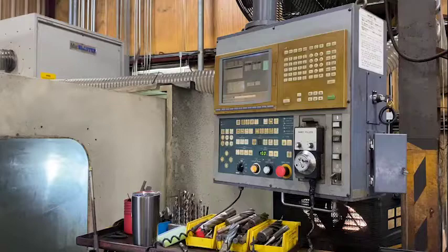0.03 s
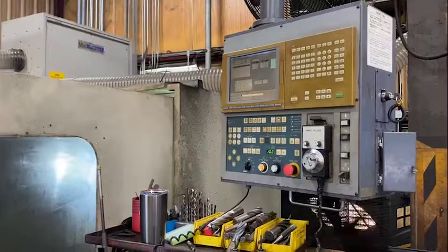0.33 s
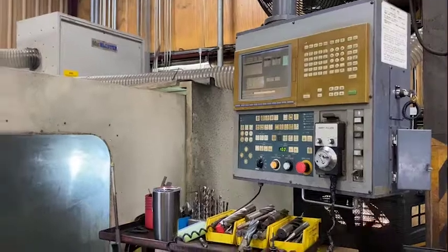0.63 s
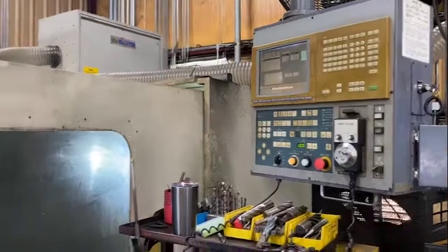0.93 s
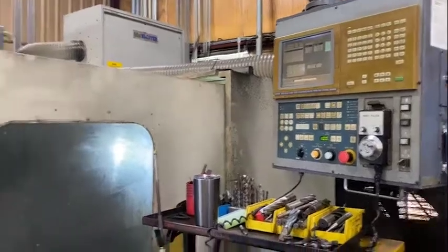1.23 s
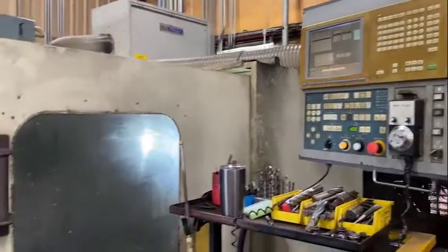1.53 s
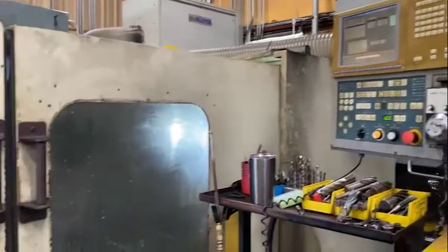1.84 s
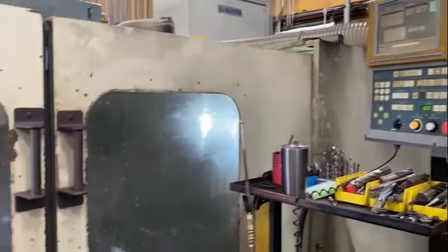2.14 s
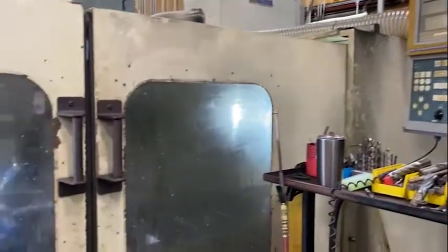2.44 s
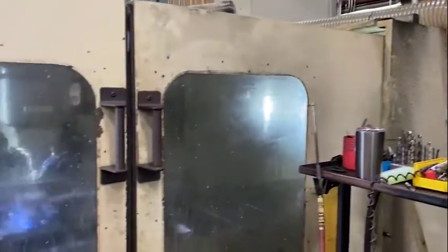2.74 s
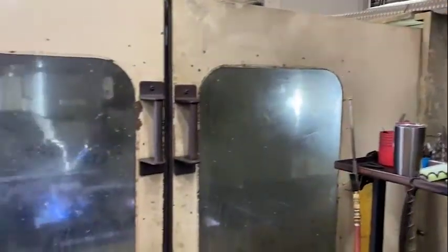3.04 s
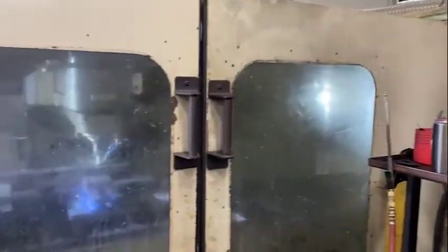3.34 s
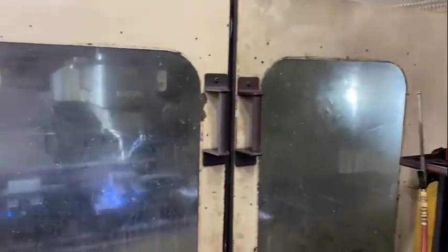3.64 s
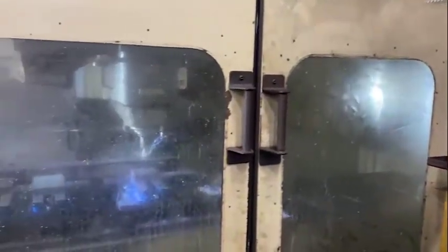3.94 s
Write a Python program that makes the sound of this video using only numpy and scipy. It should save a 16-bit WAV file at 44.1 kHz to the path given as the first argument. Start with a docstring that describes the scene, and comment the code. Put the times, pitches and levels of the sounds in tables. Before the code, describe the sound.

In a workshop, a running machine tool gives a steady droning hum, heard from a slowly passing microphone. High whines waver and rubbing metal swishes in an even rhythm; a short groan slides down, and later a spray hisses once.

```python
"""The spindle of a machining centre sings a harmonic series behind closed doors in a workshop.
Under it, motors hum and the enclosure rumbles through the resonances of its sheet-metal guards.
The drives whine and whistle, a turning part rubs metal modes into a steady rhythm of swishes, a groan
slides down, and once a spray hisses against the guard. A phone carried slowly past hears the tones
swell and fade as they interfere with their reflections."""
import sys
import numpy as np
from scipy import signal
from scipy.fft import rfft, irfft
from scipy.io import wavfile

SR = 44100
rng = np.random.default_rng(int(sys.argv[2]) if len(sys.argv) > 2 else 0)


def transcribe(signal):
    """Save signal, clipped to [-1, 1], as a 16-bit WAV file at the path in sys.argv[1]."""
    frames = np.atleast_2d(signal).T
    limited = np.clip(frames, -1, 1)
    pcm = np.round(limited * 32767).astype(np.int16)
    wavfile.write(sys.argv[1], SR, pcm)


N = 176400

# likeness of the sound field at the two microphones (frequency [Hz], correlation [-1 to 1])
CORRELATION = [(30, 1), (120, 0.93), (280, 0.84), (500, 0.49), (800, 0.43), (1500, -.1), (2200, 0.28),
               (3500, 0.4), (4500, 0.73), (5600, 0.09), (7000, 0.76), (9000, 1), (13000, 0.7), (16000, .7)]


def undb(db):
    """Amplitude ratio of a level in decibels."""
    return 10 ** (np.asarray(db) / 20)


def times():
    """Time of every sample [s]."""
    return np.arange(N) / SR


def bins():
    """Frequency of every spectral bin [Hz]."""
    return np.arange(N // 2 + 1) * SR / N


def curve(rows):
    """Linear interpolation in time through (time [s], value) rows."""
    return np.interp(times(), *np.array(rows).T)


def along(rows, hz):
    """Linear interpolation in log frequency through (frequency [Hz], value) rows."""
    frequencies, values = np.array(rows).T
    return np.interp(np.log(hz + 1e-3), np.log(frequencies), values)


def bell(offset, width):
    """Gaussian pulse of unit height whose standard deviation is the width."""
    return np.exp(-.5 * (offset / width) ** 2)


def flicker(rate_hz):
    """Low-pass Gaussian noise of unit variance."""
    motion = irfft(rfft(rng.standard_normal(N)) * np.exp(-(bins() / rate_hz) ** 2), N)
    return motion / motion.std()


def drift(rate_hz, points=200):
    """Slow low-pass noise of zero mean and about unit variance, interpolated from a coarse grid."""
    hz = bins()[:points // 2 + 1]
    lowpass = np.exp(-(hz / rate_hz) ** 2) * (hz > 0)
    motion = irfft(rfft(rng.standard_normal(points)) * lowpass, points)
    return np.interp(np.linspace(0, points - 1, N), np.arange(points), motion / motion.std())


def phase_per_hz(wander, rate_hz=4):
    """Phase is the integral of frequency, which here wanders by a small fraction."""
    return 2 * np.pi * np.cumsum(1 + wander * drift(rate_hz)) / SR


def walk_gain(levels_db, passing_s=(0.44, 1.94, 3.03)):
    """Level depends on position: the phone passes the control panel, a place between, then the doors."""
    return undb(curve(list(zip(passing_s, levels_db))))


def room_noise(gain):
    """Partial coherence: independent mid and side noises set how alike the two channels are."""
    alike = np.clip(along(CORRELATION, bins()), -.995, .995)
    spectra = rfft(rng.standard_normal((2, N))) * gain
    mid, side = spectra * np.sqrt(np.array([1 + alike, 1 - alike]) * SR / 4)
    return irfft(np.array([mid + side, mid - side]), N)


def room_tone(phase, hz, scatter, rate_hz):
    """Interference: reflections add a random phasor to a tone, changing as the microphones move."""
    alike = np.clip(along(CORRELATION, hz), -.99, .99)
    mid = 1 + scatter * (drift(rate_hz) + 1j * drift(rate_hz)) / np.sqrt(2)
    side = 1j + scatter * (drift(rate_hz) + 1j * drift(rate_hz)) / np.sqrt(2)
    phasors = np.sqrt(1 + alike) * mid + np.sqrt(1 - alike) * side * np.array([[1], [-1]])
    return (phasors * np.exp(1j * phase)).real / np.sqrt(1 + scatter ** 2)


def panel_response(ripple_db=2.2, spacing_hz=9):
    """Closely spaced resonances of the sheet-metal guards ripple the spectrum, less so in the bass."""
    hz = np.arange(0, SR / 2, spacing_hz)
    ripple = np.interp(bins(), hz, rng.standard_normal(len(hz)))
    gain = undb(ripple_db * ripple * np.minimum(bins() / 300, 1))
    return gain / np.sqrt(np.mean(gain ** 2))


def enclosure_wash(octaves=9, lowest_hz=50, treble_hz=9400):
    """Broadband noise filtered by panel resonances; its octaves swell together and flicker singly."""
    # enclosure rumble, fans and coolant (frequency [Hz], spectral density [dB per Hz])
    density = [(20, -82), (35, -56), (52, -50.5), (78, -49.5), (98, -52), (130, -51.5), (180, -56),
               (255, -53.5), (305, -60.5), (450, -60.5), (700, -64.5), (1000, -64.5), (1650, -65.5),
               (2200, -69.5), (3000, -75), (3700, -77.5), (4500, -76.5), (5500, -81.5), (7000, -83),
               (10000, -84), (12000, -86), (16000, -87.5)]
    # overall rise and fall along the walk (time [s], level [dB])
    nearness = [(.1, -1), (.8, 0.5), (2, 0), (3, -0.6), (4, 0.1)]
    # further rise and fall of the treble (time [s], level [dB])
    treble_level = [(.1, 2.5), (.7, 0), (1.4, -2), (2.3, 0.5), (3, 0.5), (3.6, -4), (4, -0.5)]
    spectrum = rfft(room_noise(undb(along(density, bins())) * panel_response()))
    octave = np.clip(np.log2((bins() + 1) / lowest_hz), 0, octaves - 1)
    wash = 0
    for k in range(octaves):
        band = irfft(spectrum * np.maximum(0, 1 - abs(octave - k)), N)
        treble_share = min(1, (lowest_hz * 2 ** k / treble_hz) ** 2)
        wash += band * undb(0.96 * flicker(rate_hz=20) + treble_share * curve(treble_level))
    return wash * undb(curve(nearness) + 0.45 * drift(rate_hz=3.5))


def motor_hum():
    """Periodic vibration: pumps, fans and transformers each radiate at their own frequency."""
    # hum lines (frequency [Hz], level at each of the three places on the walk [dB])
    lines = [(35, -45, -44, -42.5), (72.35, -41, -43, -40.5), (84.24, -38.5, -35, -36.5),
             (109.8, -48, -38.5, -38.5), (119.2, -46, -54, -42.5), (238.6, -45.5, -38.5, -39),
             (266.1, -43.5, -57, -42), (338, -48, -42, -57), (354.3, -35.5, -38, -33),
             (375, -43, -60, -48.5), (439.4, -55, -51, -52), (480, -50, -48, -53), (535.5, -49, -41, -44.5),
             (586, -53, -48, -58), (802.5, -54, -49, -42.5), (908, -57, -48, -54), (1493, -57, -58, -51),
             (1701, -60, -56, -42)]
    hum = 0
    for hz, *levels_db in lines:
        phase = hz * phase_per_hz(wander=.004) + rng.uniform(0, 2 * np.pi)
        hum += walk_gain(levels_db) * room_tone(phase, hz, scatter=.7, rate_hz=10)
    return hum


def whine(hz=1706):
    """Slight random frequency modulation makes a midrange whine waver."""
    # strength of the whine (time [s], level [dB])
    level = [(.1, -53), (.4, -56), (.7, -49), (1.2, -49), (1.55, -50), (1.9, -47), (2.35, -38.5),
             (2.6, -58), (4, -58)]
    phase = hz * phase_per_hz(wander=.0012, rate_hz=9.1)
    return room_tone(phase, hz, scatter=.4, rate_hz=5) * undb(curve(level))


def groan(band_hz=61):
    """Narrowband noise about a falling centre frequency: a rough resonance slides down and dies."""
    # path of the resonance (time [s], frequency [Hz], level [dB])
    glide = [(1.3, 1663, -59), (1.46, 1574, -39.5), (1.58, 1466, -42), (1.7, 1464, -37), (1.9, 1440, -62)]
    at_s, hz, db = np.array(glide).T
    phase = 2 * np.pi * np.cumsum(curve(np.c_[at_s, hz])) / SR
    channels = [flicker(band_hz) * np.cos(phase) + flicker(band_hz) * np.sin(phase) for _ in range(2)]
    return np.array(channels) * undb(curve(np.c_[at_s, db]))


def drive_sidebands(carrier_hz=4007.5, spacing_hz=60, outer_db=-22):
    """Beating: sidebands one and three spacings either side of the drive's switching tone interfere."""
    # strength of the lower sidebands (time [s], level [dB])
    lower_level = [(.1, -58), (.5, -59), (1.1, -55), (1.8, -53), (2.35, -75), (2.65, -51), (3, -41.5),
                   (3.25, -46), (3.42, -54.5), (3.6, -45), (4, -47)]
    # strength of the upper sidebands (time [s], level [dB])
    upper_level = [(.1, -45.5), (.85, -48.5), (1.2, -59), (1.6, -62), (2.35, -55), (2.6, -46), (2.95, -43),
                   (3.2, -54), (3.7, -59), (4, -62)]
    sidebands = 0
    for offset_hz, level in ((-spacing_hz, lower_level), (spacing_hz, upper_level)):
        for k, db in ((1, 0), (3, outer_db)):
            phase = 2 * np.pi * (carrier_hz + k * offset_hz) * times()
            line = room_tone(phase, carrier_hz, scatter=0.37, rate_hz=0.97)
            sidebands += line * undb(curve(level) + db)
    return sidebands


def servo_whistles(fade_db=5):
    """Standing waves: high tones fade in and out as the phone crosses nodes and antinodes."""
    # whistles of the servo drives (frequency [Hz], RMS level [dB])
    lines = [(6599, -61), (7073, -61), (7601, -67), (7848, -68), (8134, -62), (8381, -59), (8683, -62),
             (8973, -56), (9571, -68), (9829, -60), (10174, -60.5), (11051, -67.5), (11423, -61.5),
             (11666, -58), (12100, -71), (12360, -56), (12774, -68), (13022, -57), (13495, -60),
             (13705, -68), (14220, -65), (14430, -65), (14922, -67), (15160, -65), (15643, -61)]
    whistles = 0
    for hz, db in lines:
        fade = undb(fade_db * drift(rate_hz=7))
        fade /= np.sqrt(np.mean(fade ** 2) / 2)
        whistles += undb(db) * fade * np.sin(hz * phase_per_hz(wander=.0007, rate_hz=17.7))
    return whistles


def whistle_flares():
    """Amplitude modulation by Gaussian pulses: single whistles swell for a moment."""
    # brief swells (time [s], frequency [Hz], highest RMS level [dB], Gaussian width [s])
    swells = [(.14, 11666, -53, 0.046), (.21, 9829, -51, 0.051), (.28, 12360, -54, 0.088),
              (.3, 11600, -53, 0.099), (.362, 8660, -43, 0.065), (.5, 8683, -48, .025),
              (.51, 13022, -43, .04), (0.566, 7601, -50, .05), (.6, 9400, -53, .035), (.6, 12360, -56, .05),
              (0.994, 8080, -43, 0.03), (1.16, 14922, -47, .05), (1.544, 11423, -48, 0.065),
              (1.69, 12700, -51, .04), (1.82, 15643, -57, .05), (1.85, 14922, -53, .12),
              (2.103, 11423, -49, 0.031), (2.26, 12260, -45.5, .06), (2.274, 8134, -45, 0.037),
              (2.38, 11051, -52, 0.067), (2.57, 8381, -48, 0.065), (2.76, 14922, -48, .045),
              (2.922, 10174, -55, .07), (2.965, 14922, -45, .018), (3.144, 10174, -45, .032),
              (3.68, 14800, -53, 0.036), (3.68, 15643, -53, .1)]
    flares = 0
    for at_s, hz, db, width_s in swells:
        whistle = np.sqrt(2) * np.sin(hz * phase_per_hz(wander=.0007, rate_hz=19))
        flares += undb(db) * bell(times() - at_s, width_s) * whistle
    return flares


def metal_rasp(centre_hz=5992, flutter_hz=97):
    """Roughness from fast beats: a thin metallic ring flutters against its sidebands."""
    # the ring and its sidebands (offset from the centre [flutter steps], relative level [dB])
    lines = [(-1.1, -0.5), (0, 2.5), (0.92, 2)]
    # coming and going of the ring (time [s], level [dB])
    level = [(1, -70), (1.3, -58), (1.55, -55), (1.9, -64), (2.25, -57.5), (2.9, -58.5), (3.3, -73)]
    turn = phase_per_hz(wander=.0018, rate_hz=19.6)
    ring = 0
    for steps, db in lines:
        phase = (centre_hz + steps * flutter_hz) * turn
        ring += undb(db) * room_tone(phase, centre_hz, scatter=.9, rate_hz=8.6)
    return ring * undb(curve(level))


def rubbing_swishes(first_s=.41, period_s=.416, rise_s=.055, fall_s=.07, band_hz=28):
    """Friction excites metal modes in a shifting balance; each turn brings a strong rub and a weak one."""
    # modes of the scraped metal (frequency [Hz], relative level [dB])
    modes = [(4215, -7), (4300, -2), (4385, -0.5), (4450, -3), (4520, 0), (4590, -3), (4650, -0.5),
             (4720, 2), (4790, -6), (4880, -13)]
    # strength of the swishes (time [s], level [dB])
    level = [(.42, -42.5), (.83, -42.5), (1.25, -42), (1.67, -41), (2.08, -40), (2.5, -42), (2.9, -41.5),
             (3.3, -41.5), (3.75, -43)]

    def from_nearest(rub_s):
        return (times() - rub_s + period_s / 2) % period_s - period_s / 2

    offset_s = from_nearest(first_s)
    strong_rub = bell(offset_s, np.where(offset_s < 0, rise_s, fall_s))
    weak_rub = 0.4 * bell(from_nearest(first_s + 0.16), width=0.031)
    scrape = 0
    for hz, db in modes:
        resonance = 1 / (1 + ((bins() - hz) / band_hz) ** 2)
        scrape += room_noise(resonance) * undb(db + 2.2 * drift(rate_hz=8.8))
    ragged_gain = undb(curve(level) + drift(rate_hz=20))
    return scrape / scrape.std() * (strong_rub + weak_rub) * ragged_gain


def spray(start_s=3.213, attack_s=.03, hold_s=.035, body_decay_s=0.25, treble_decay_s=0.13):
    """A spray on the guard gives sputtering noise that decays exponentially, the treble first."""
    # hiss of the spray (frequency [Hz], spectral density [dB per Hz])
    density = [(300, -85), (900, -73), (1700, -65.5), (3000, -71), (4500, -72.5), (7000, -76),
               (11500, -77.5), (13500, -88), (16000, -91)]
    since_s = times() - start_s
    attack = np.clip(since_s / attack_s, 0, 1)
    dying_s = np.maximum(since_s - attack_s - hold_s, 0)
    hiss = room_noise(undb(along(density, bins())))
    body = irfft(rfft(hiss) / (1 + (bins() / 5500) ** 4), N)
    treble = hiss - body
    decaying = body * np.exp(-dying_s / body_decay_s) + treble * np.exp(-dying_s / treble_decay_s)
    sputter = undb(2 * flicker(rate_hz=150))
    return attack * decaying * sputter


def spindle(fundamental_hz=262.4):
    """Periodic motion of spindle and cutter gives a harmonic series; reflections shift each phase."""
    # spindle tone (harmonic number, level at each of the three places on the walk [dB])
    harmonics = [(1, -41, -40, -43), (2, -40, -40.5, -42.5), (3, -50, -48, -44.5), (4, -41.5, -41, -47),
                 (5, -54, -49, -43.5), (6, -47, -55, -50), (7, -69, -45.5, -47.5), (8, -61, -70, -48),
                 (9, -54, -54, -48), (10, -61, -61, -78), (11, -55, -57.5, -56)]
    fundamental_phase = fundamental_hz * phase_per_hz(wander=0.0012)
    song = 0
    for k, *levels_db in harmonics:
        phase = k * fundamental_phase + rng.uniform(0, 2 * np.pi)
        song += walk_gain(levels_db) * room_tone(phase, k * fundamental_hz, scatter=0.6, rate_hz=5)
    return song


def scene():
    """Superposition: the sound pressures of all parts of the machine add."""
    machine = enclosure_wash() + spindle() + motor_hum() + whine() + groan()
    drives = drive_sidebands() + servo_whistles() + whistle_flares()
    return machine + drives + metal_rasp() + rubbing_swishes() + spray()


def record(dry, lag_s=0.00025, lag_from_hz=6986, start_s=.106, top_hz=15750):
    """Level and time differences: the balance tilts, and above 7 kHz the left channel lags slightly
    behind the right. The sound begins abruptly and a low-pass filter cuts the top."""
    # balance of the channels (frequency [Hz], left minus right level [dB])
    balance = [(60, 0.5), (150, -1), (700, -0.3), (1500, -2), (2300, 0), (3000, 2.5), (5500, 3),
               (7000, -0.5)]
    phase_lag = 2 * np.pi * lag_s * np.maximum(bins() - lag_from_hz, 0)
    # each channel takes half of the level and phase difference
    left = undb(along(balance, bins()) / 2) * np.exp(-1j * phase_lag / 2)
    heard = irfft(rfft(dry) * np.array([left, 1 / left]), N) * (times() >= start_s)
    lowpass = signal.ellip(10, .2, 80, top_hz, fs=SR, output="sos")
    return signal.sosfilt(lowpass, heard)


dry = scene()
out = record(dry)
transcribe(out)
```